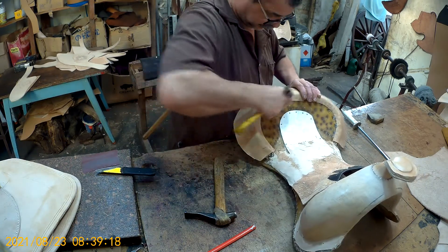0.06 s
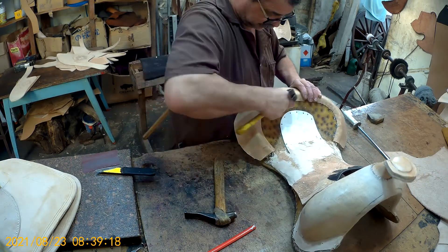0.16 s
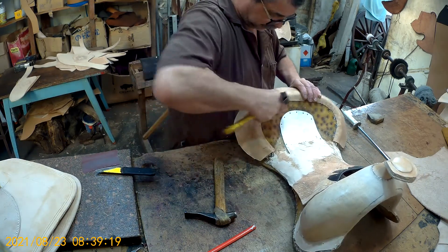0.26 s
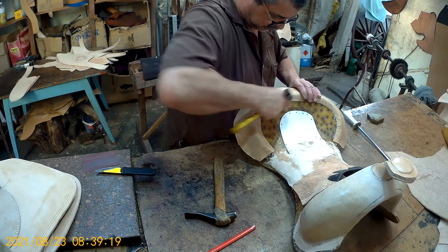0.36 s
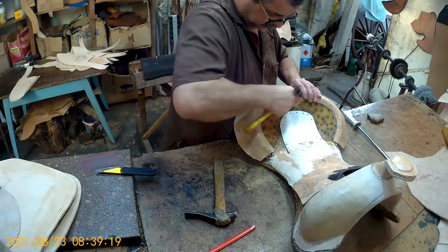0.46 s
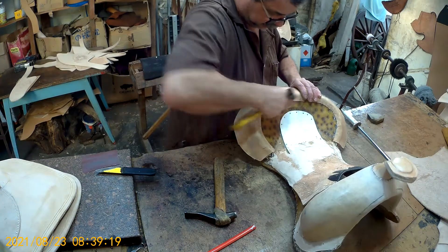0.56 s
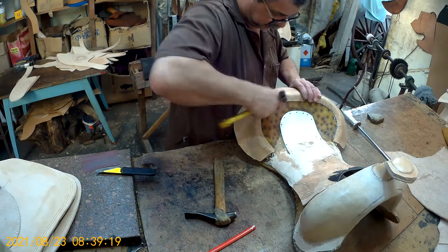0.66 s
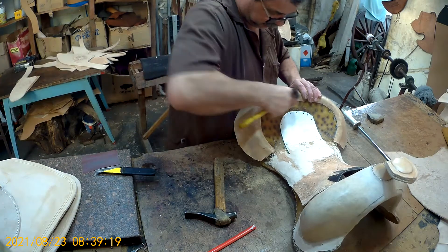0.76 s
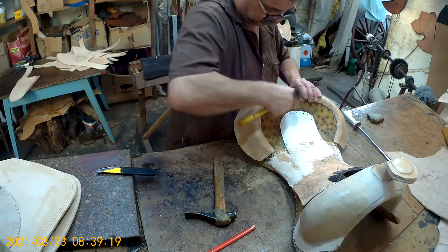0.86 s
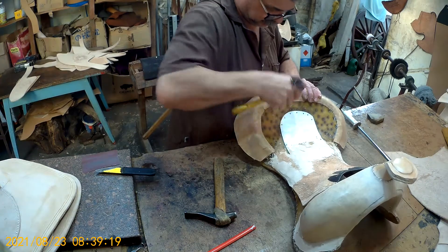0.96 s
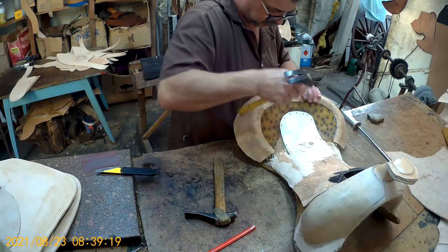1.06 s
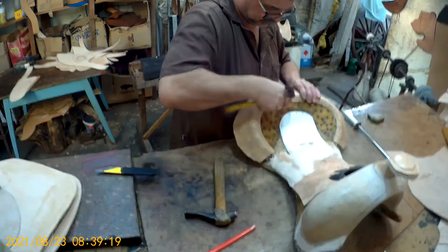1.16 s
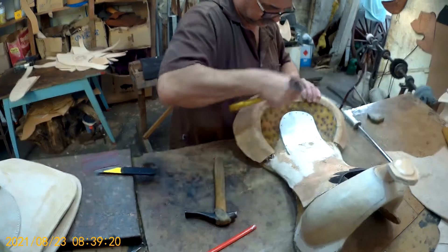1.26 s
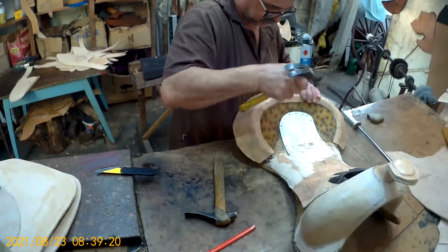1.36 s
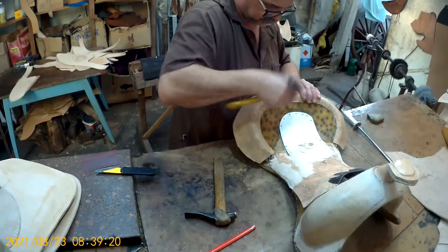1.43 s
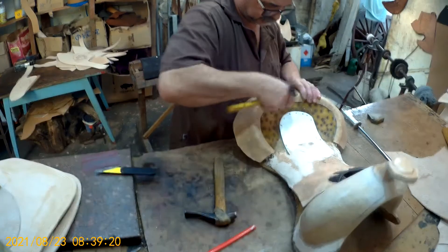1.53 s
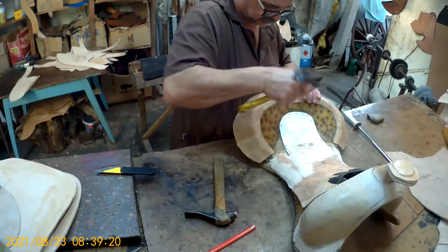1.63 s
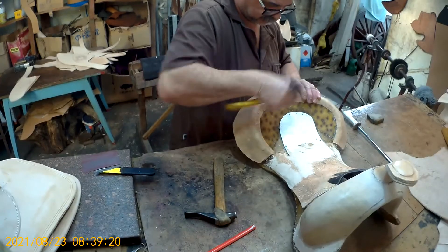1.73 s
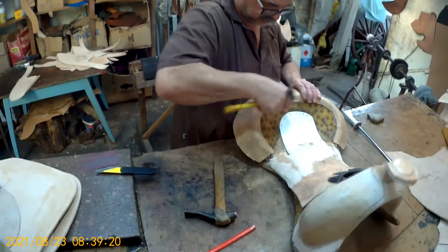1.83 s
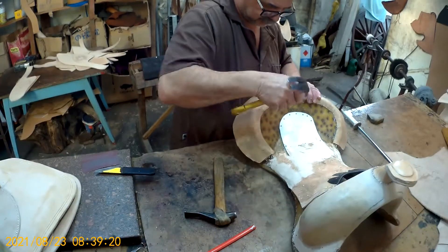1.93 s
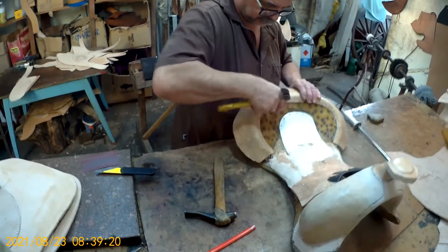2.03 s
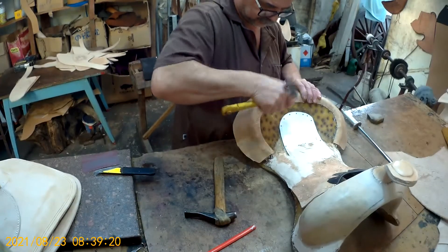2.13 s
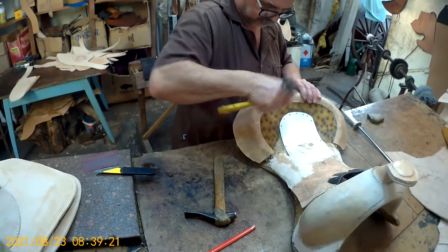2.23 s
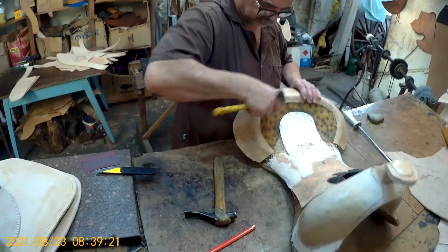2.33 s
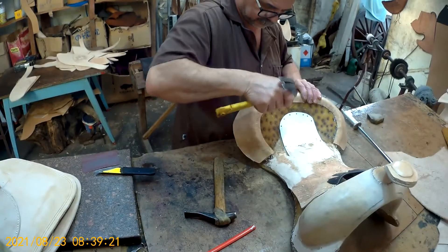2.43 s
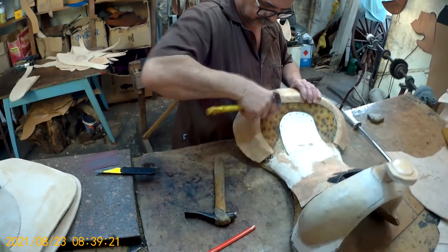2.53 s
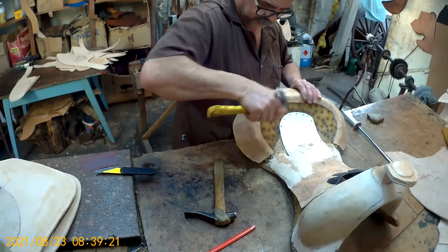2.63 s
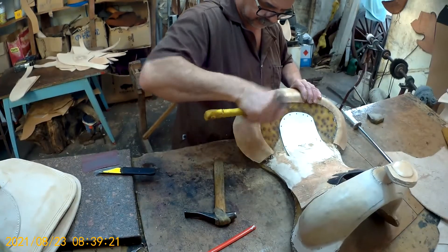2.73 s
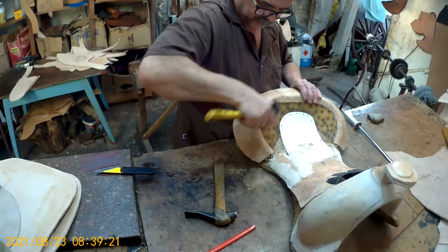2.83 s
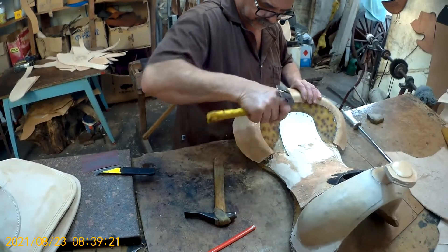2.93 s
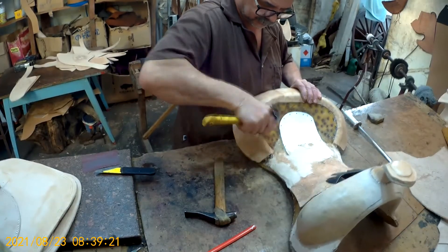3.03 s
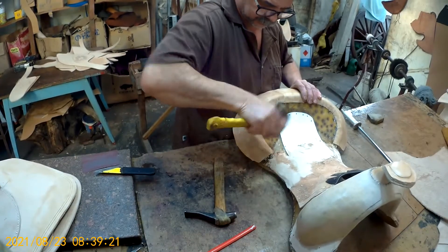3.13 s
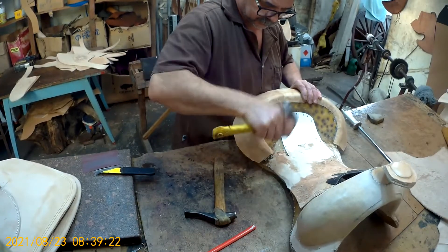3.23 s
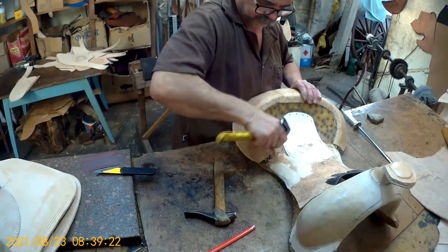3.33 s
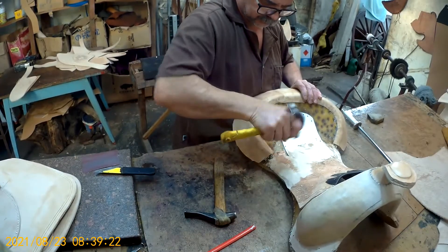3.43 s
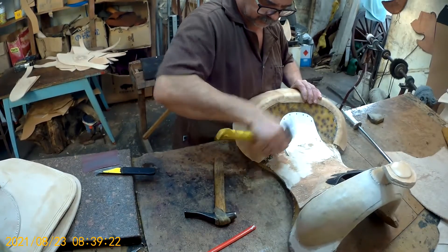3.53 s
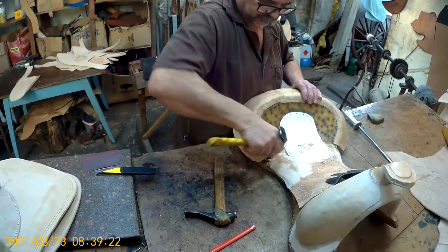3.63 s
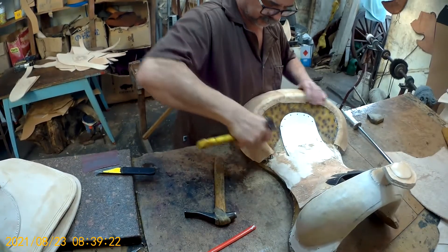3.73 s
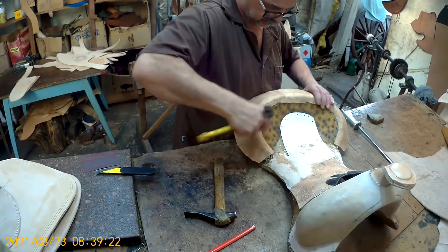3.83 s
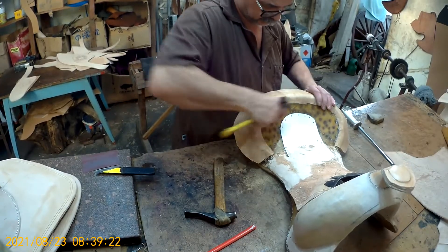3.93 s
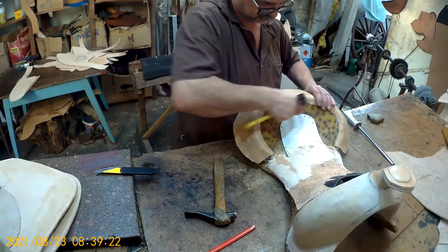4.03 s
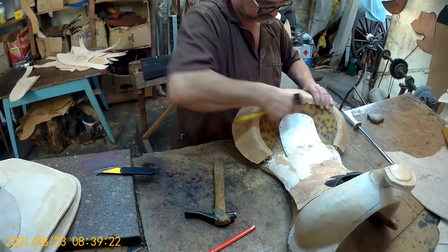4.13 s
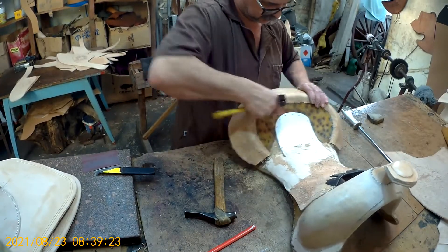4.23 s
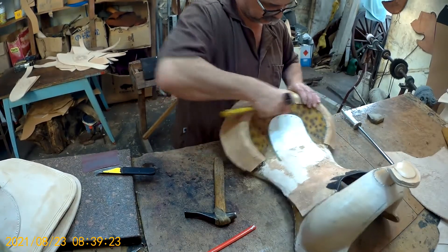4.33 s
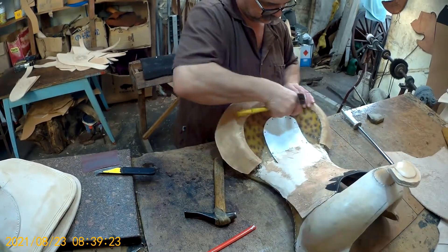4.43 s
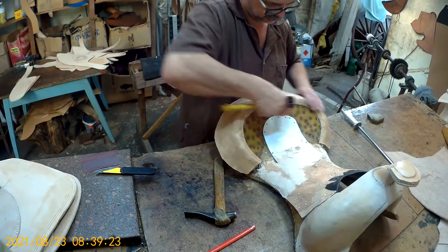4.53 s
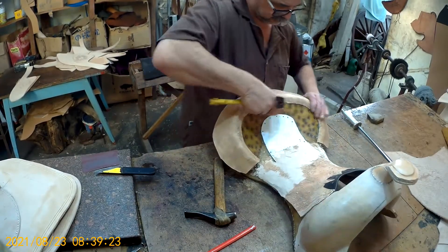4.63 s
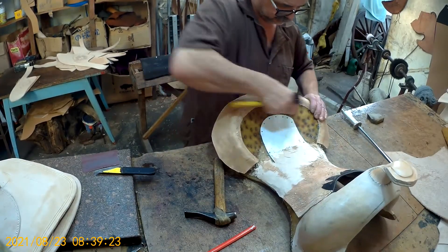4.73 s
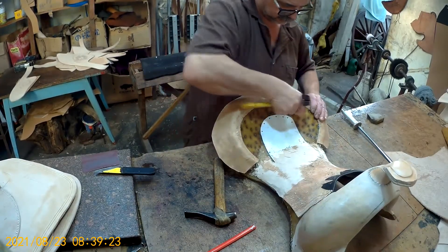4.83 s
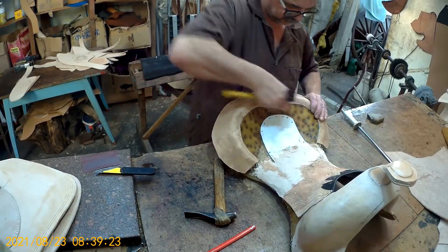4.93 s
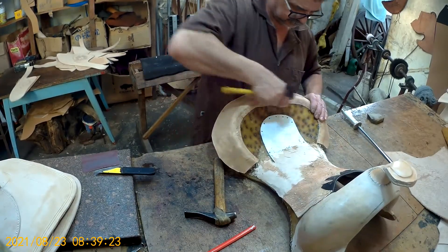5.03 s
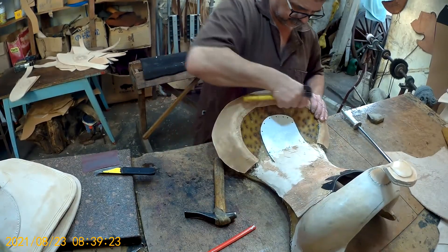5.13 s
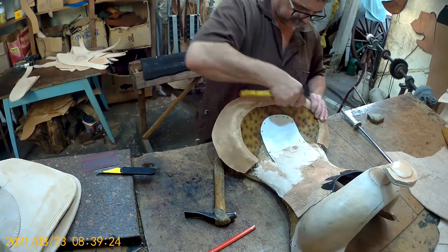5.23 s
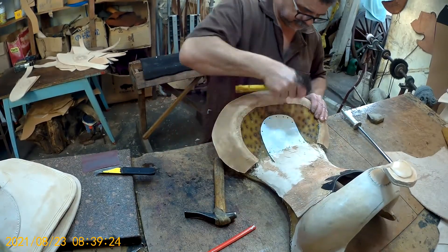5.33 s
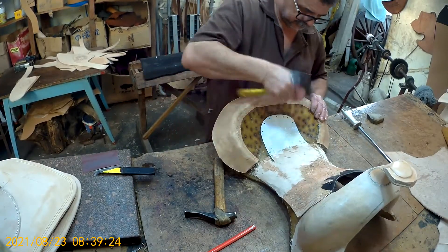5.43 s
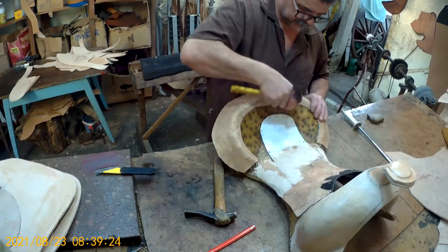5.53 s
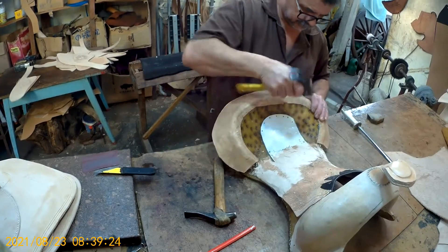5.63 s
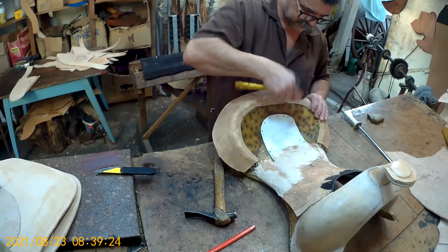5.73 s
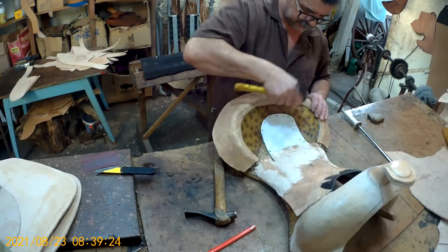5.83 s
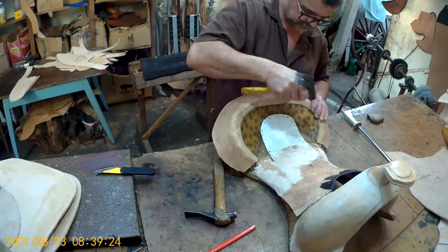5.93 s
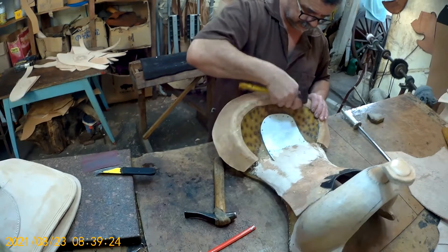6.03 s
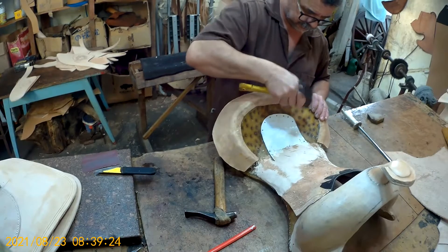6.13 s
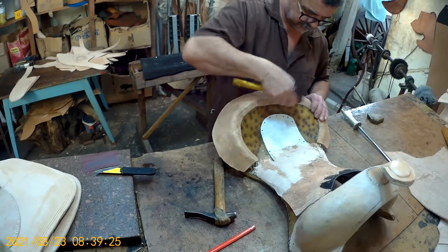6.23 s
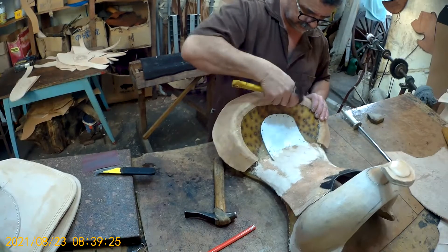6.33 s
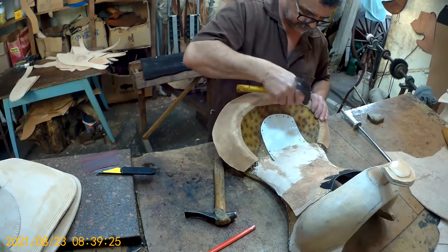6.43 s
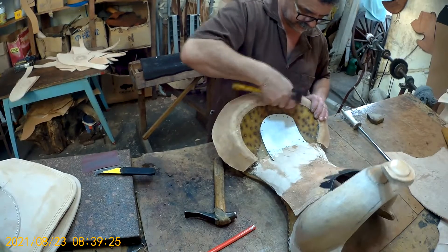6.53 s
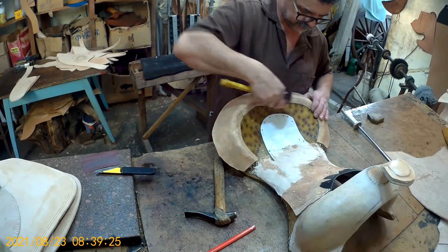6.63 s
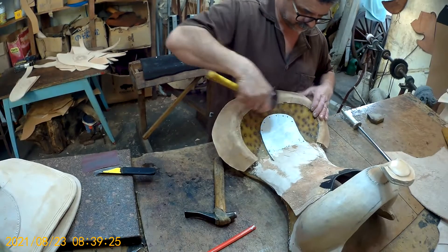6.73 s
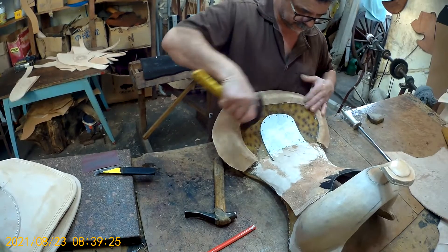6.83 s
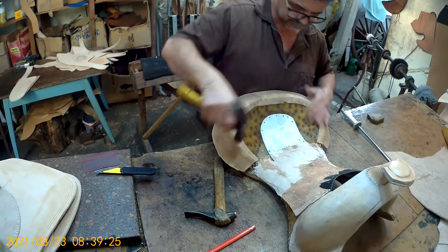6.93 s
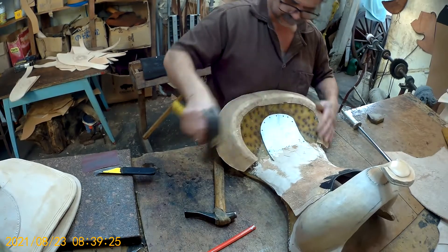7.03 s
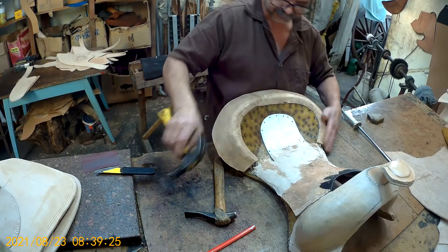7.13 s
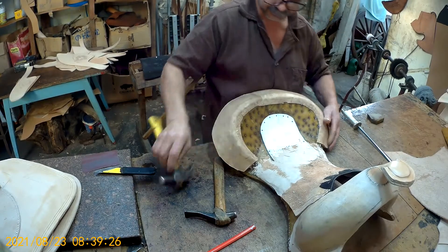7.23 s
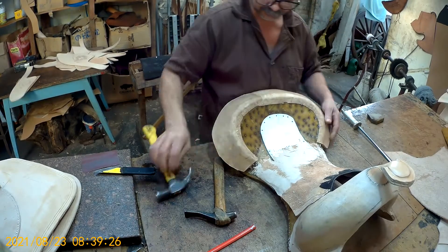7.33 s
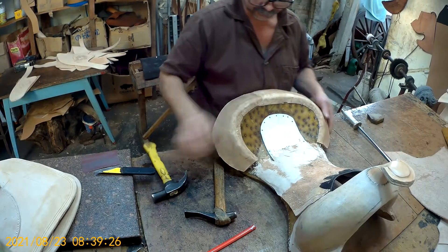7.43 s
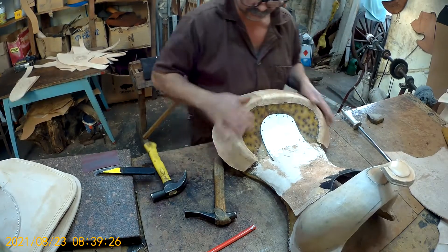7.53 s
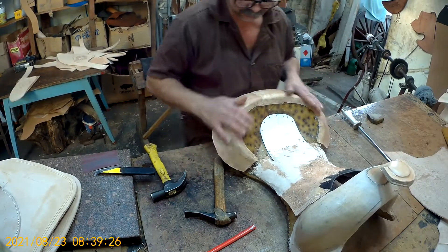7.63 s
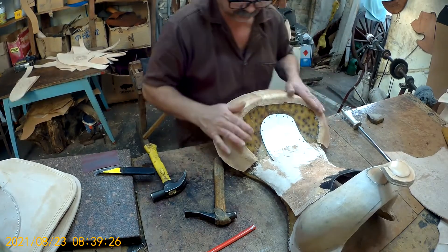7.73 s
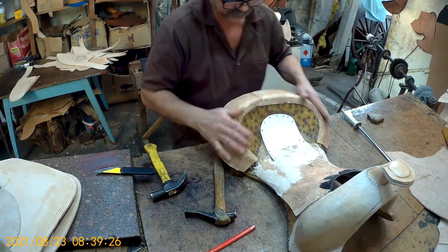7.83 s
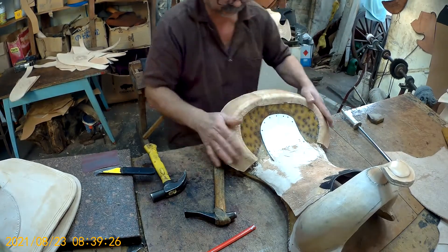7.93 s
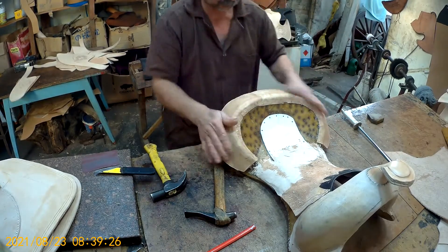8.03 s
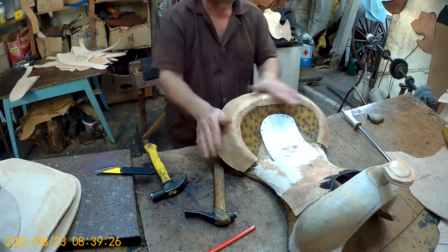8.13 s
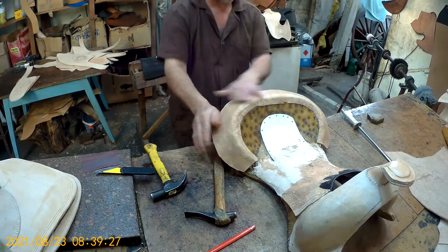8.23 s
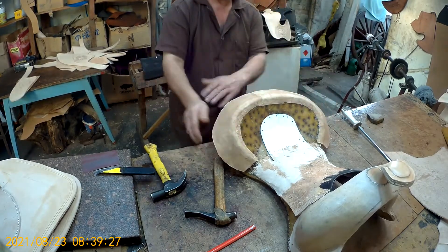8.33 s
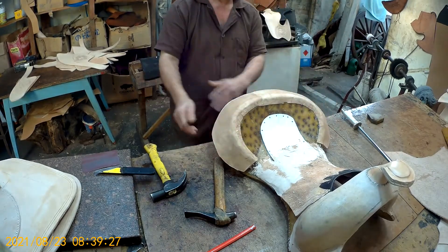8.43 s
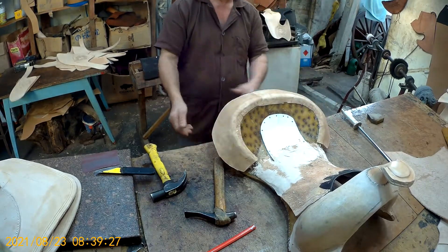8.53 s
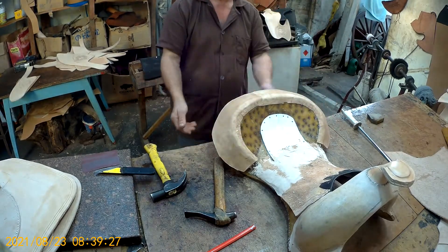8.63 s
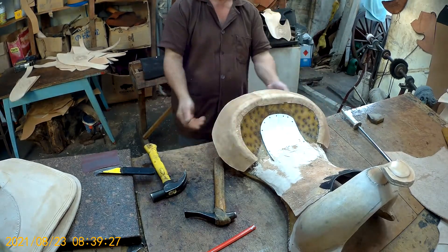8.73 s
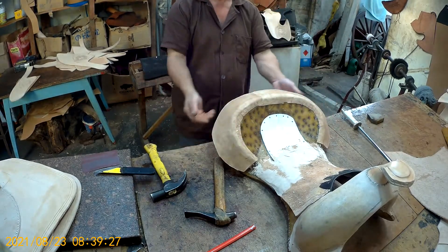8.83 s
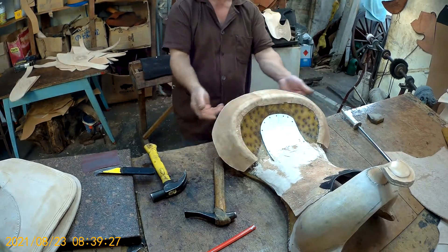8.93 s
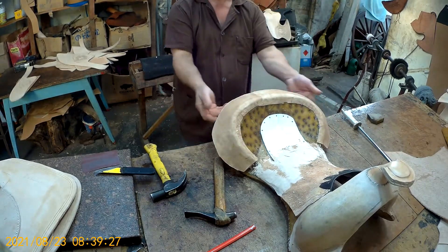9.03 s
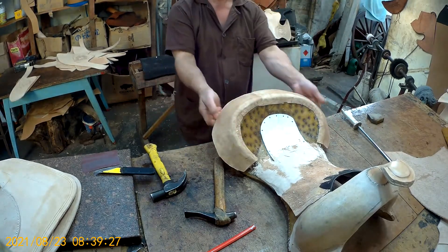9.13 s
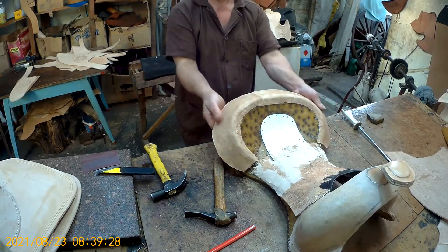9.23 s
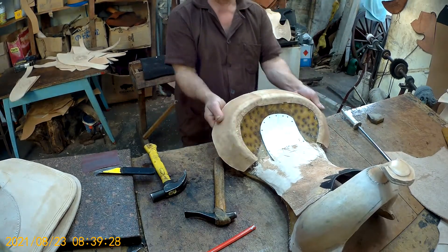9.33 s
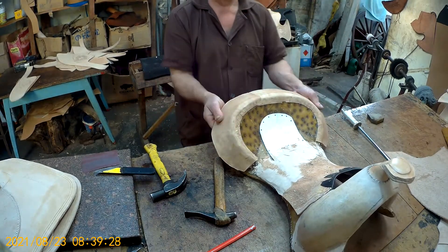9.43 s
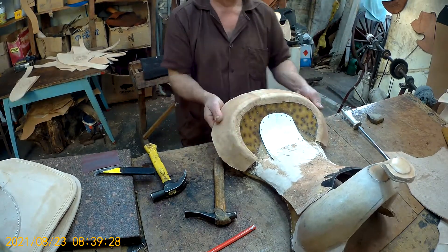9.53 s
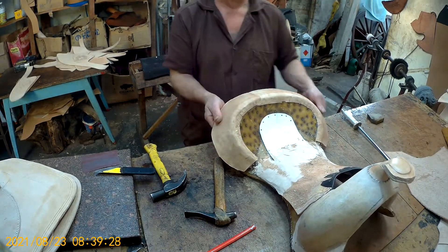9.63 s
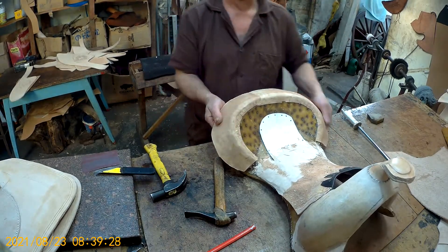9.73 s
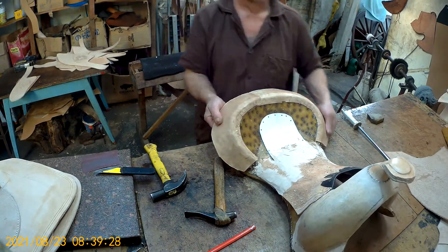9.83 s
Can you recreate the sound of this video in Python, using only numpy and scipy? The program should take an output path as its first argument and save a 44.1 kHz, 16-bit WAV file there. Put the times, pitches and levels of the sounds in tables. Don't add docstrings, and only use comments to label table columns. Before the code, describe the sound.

In a small workshop, hollow woody hammer blows come in two runs between leathery scrapes, ending with a tool clacking down and soft rubbing.

```python
import sys
import numpy as np
from scipy import signal
from scipy.fft import next_fast_len
from scipy.io import wavfile
from scipy.ndimage import uniform_filter1d, minimum_filter1d

SR = 44100
rng = np.random.default_rng(int(sys.argv[2]) if len(sys.argv) > 2 else 0)


def int16_out(signal):
    q = np.round(np.clip(np.atleast_2d(signal).T, -1, 1) * 32767)
    wavfile.write(sys.argv[1], SR, q.astype(np.int16))


def ratio_of_db(decibels):
    return 10 ** (np.asarray(decibels, float) / 20)


N = 435266

# t/s, level/dB, place along the rim [0-2]
BLOWS = [(1.066, 2.5, 0.14), (1.378, 3.5, 0.2), (1.683, 2, 0.088), (1.943, 1, 0), (2.196, 1.5, 0.16),
         (2.447, -2.5, 0.74), (2.69, -4.5, .98), (2.947, -3.5, 1.03), (3.205, -0.5, 1.25),
         (3.473, -2, 0.29), (5.407, 3.5, 2.04), (5.684, 3.5, 1.9), (5.931, 3, 2.5), (6.174, 3.5, 1.95),
         (6.42, 2.5, 1.92)]
# level/dB at place 0, 1, 2
RIM_DRIVE = [(-19, -15, -18), (-14.5, -2.5, -19.5), (-11.5, -6.5, -11.5), (-6, -11, -16)]
# t/s, level/dB, bench weight/dB, hardness/dB (shell up, bend down)
ROCKS = [
    (1.125, -23, -19, 7),
    (1.168, -22, 7, 5),
    (1.435, -23, -23, 3),
    (1.482, -20, 2.5, 1.5),
    (1.738, -35, 11, -15),
    (1.775, -26, 9.5, -4),
    (2.04, -35, 15.5, -12.5),
    (3.62, -70, 7, 3),
]
# t/s, level/dB, bench weight/dB, hardness/dB
LAID_DOWN = [
    (7.192, -10, -11.5, 0),
    (7.275, -7, -10.5, 2),
    (7.291, -2.5, -25, 4.5),
    (7.337, -14, -3, -4.5),
    (7.352, -3.5, -36, 2.5),
    (7.394, -10.5, -36, 1.5),
    (7.412, -35, -3, 14),
    (7.494, -26.5, -23, 13),
    (7.568, -30.5, -13, 3),
]
# t/s, level/dB, bench weight/dB, hardness/dB
KNOCKS = [(.109, -30.5, 9.5, -5), (.31, -47, 0, 13), (.33, -37, 0, -4), (.368, -27, -2, 2.5),
          (.467, -22, 3.5, -1.5), (.547, -30.5, 7, 0.5), (.658, -38.5, -1, 3.5), (.682, -36.5, -3, -8),
          (.782, -47, -14, 11), (3.739, -43, 7, 13), (3.827, -41, 12.5, 9), (3.901, -33.5, 11.5, 6.5),
          (4.247, -25.5, 4, -3.5), (4.337, -37, 11, -2), (4.427, -20.5, -11, 10.5),
          (4.669, -26.5, -17, -4.5), (6.671, -17, -3, 3), (6.691, -24.5, -0.5, 7), (6.711, -20, -6, -4),
          (6.737, -31, 3, 11), (6.765, -45, 2, -1)]

# f/Hz, level/dB, t60/s
BENCH = [(43.7, -21, 0.4), (73.3, -19, 0.59), (114.2, -2.5, 0.28), (153.4, -3.5, 0.11), (194, -11.5, 0.12),
         (238.5, -2.5, 0.12)]
# f/Hz, level/dB, t60/s
BEND = [(276, -15.5, 0.14), (358.6, 0, 0.087), (319, -17, 0.2), (408.8, 0, 0.078), (470, -9, 0.076),
        (517.6, -7.5, 0.1)]
# f/Hz, level/dB, t60/s
RING = [(593, -7.5, 0.047), (690.6, -2, 0.074), (826, -6, 0.054), (728.8, -5.5, 0.1), (635, -9.5, 0.03)]
# f/Hz, level/dB, t60/s
SHELL = [(900.5, -2.5, 0.038), (969, -3.5, 0.042), (1050, 1, 0.025), (1198.6, -5.5, 0.026),
         (1316, -4.5, 0.02), (1542, -7.5, 0.014), (1811, -14, 0.022), (2196, -15, 0.021),
         (2834, -27.5, 0.044)]
# rise/s, roughness [0-1]
RISE_ROUGH = [(.012, .15), (.002, .2), (.0012, .15), (.0007, .7)]
# f/Hz, level/dB, t60/s
CRACK = [(251, 12, 0.056), (775, 11, 0.0083), (1600, -27, 0.25), (2420, -6.5, 0.02), (3680, -6.5, 0.012),
         (7660, -8, 0.0067), (16000, -19, 0.022)]

# peak t/s, level/dB, rise/s, fall/s
DRAGS = [(0, -28.5, .01, 0.072), (.118, -34, .03, .1), (.382, -30.5, 0.12, 0.089), (.466, -30, 0.008, 0.19),
         (.662, -39, .06, 0.35), (3.72, -37, 0.056, 0.87), (3.896, -33.5, .06, .06),
         (4.214, -28.5, 0.27, 0.44), (4.428, -18.5, 0.012, 0.077), (4.65, -36, 0.22, 0.35),
         (6.664, -36, 0.027, .03), (6.736, -21, 0.13, .07), (6.95, -39.5, 0.11, .9),
         (7.41, -11.5, .005, 0.045), (7.51, -24, 0.097, 0.18), (7.8, -40.5, .5, 0.34),
         (7.97, -36, 0.059, 0.37), (8.2, -43, 0.22, .07), (8.98, -33.5, 0.12, 0.46),
         (9.34, -38.5, 0.3, 0.54), (9.69, -29.5, 0.034, 0.14), (9.75, -37, 0.23, 0.013),
         (9.86, -40, 0.1, .1)]
# peak t/s, level/dB, rise/s, fall/s
SHOVES = [(0, -25.5, .01, .06), (.2, -30, 0.18, 0.04), (.32, -20, .03, 0.058), (.494, -16, .05, 0.085),
          (.662, -23.5, 0.023, 0.29), (3.65, -27, .1, 0.063), (3.862, -26, 0.13, 0.092),
          (3.966, -35, 0.13, 0.29), (4.26, -17.5, 0.029, 0.21), (4.68, -22, 0.12, 0.12),
          (5.082, -35, .35, .13), (5.37, -34, 0.093, .01), (6.67, -33, 0.036, 0.37),
          (7.16, -36, 0.22, 0.013), (7.41, -36, .005, .055), (7.51, -32, .02, .065),
          (8.03, -42, 0.27, 0.14), (9.25, -36, 0.49, 1), (9.7, -46, 0.17, .1)]
# peak t/s, level/dB, rise/s, fall/s
WIPES = [(.44, -48, 0.61, .1), (.662, -45, .05, 0.74), (3.688, -38, .06, 0.13), (3.86, -44, .2, .2),
         (4.248, -39, 0.068, 0.33), (4.68, -43, 0.13, 0.16), (6.906, -34, 0.18, 0.37), (7.43, -40, .02, .2),
         (7.5, -34.5, .05, 0.21), (7.8, -34, 0.54, 0.06), (7.95, -31, 0.093, 0.67),
         (8.17, -29.5, 0.62, 0.08), (9.2, -42.5, 0.17, 0.54), (9.7, -35, 0.13, 0.11), (9.86, -46, .2, .1)]
STROKE_DB = 20
# f/Hz, width/Hz, level/dB
SCRAPE = [(330, 150, -25), (600, 170, 31), (925, 380, 40), (1440, 270, 11), (2260, 410, -46)]
# f/Hz, width/Hz, level/dB
RUMBLE = [(58, 10.5, -3), (108, 21, -6), (143, 4.9, -45)]
# f/Hz, level/dB per Hz
SWISH = [(900, -6), (2300, -1), (4000, 0), (5500, -11), (6900, -5), (8400, -10), (9000, -15), (16000, -17)]
# t/s, level/dB, f/Hz
TICKS = [(0.112, -27, 1490), (.333, -26.5, 2320), (0.469, -21.5, 1550), (.468, -33, 2500),
         (0.549, -26, 1480), (.548, -38, 2400), (.685, -34, 2300), (0.785, -32, 1700), (3.739, -34, 1210),
         (4.388, -32, 1800), (4.428, -22.5, 2600)]
# t/s, length/s, f/Hz, level/dB
HUM = (.8, .19, 137, -30)

# f/Hz, t60/s
SHOP = [(150, 0.48), (400, 0.45), (800, 0.45), (1500, .42), (2500, 0.48), (4500, 0.16), (9000, 0.066)]
# f/Hz, level/dB per Hz
AIR = [(15, -21), (30, 0), (108, 1), (335, 0.5), (659, -4), (1130, -6), (2910, -16.5), (15000, -25)]
DROPOUTS = [.24, 1.55, 1.78, 1.84, 2.3, 2.8, 3.06, 3.16, 3.42, 4.27, 4.56, 4.65, 4.92, 5.67, 6.68, 6.79,
            6.81, 6.96, 7.24, 7.58, 8.65, 8.94, 9.74]


def strikes(rows, drive_db, contact_s, crack_db):
    lanes = np.zeros((3, N))
    chance = rng.standard_normal((len(rows), 4, 9, 2))
    crack = cracks(count=len(rows))
    push = np.hanning(max(round(contact_s * SR), 3))
    push /= push.sum()
    for k, (s, db, *spot_db) in enumerate(rows):
        parts = zip((BENCH, BEND, RING, SHELL), chance[k], RISE_ROUGH, spot_db)
        body = sum(ratio_of_db(part_db) * part_rings(modes, luck, rise_s, rough)
                   for modes, luck, (rise_s, rough), part_db in parts)
        body = np.convolve(body, push)
        dull = np.hanning(3 + round(max(-.35 * db, 0)))
        snap = np.convolve(crack[k], dull / dull.sum())
        add(body, 0, ratio_of_db(crack_db + .5 * spot_db[-1]) * snap)
        add(lanes[k % len(lanes)], s, ratio_of_db(db + drive_db) * body)
    return lanes


def on_rim(rows):
    return [(s, db, *(np.interp(place, range(3), part) for part in RIM_DRIVE)) for s, db, place in rows]


def loose(rows):
    return [(s, db, weight_db, -hard_db, 0, hard_db) for s, db, weight_db, hard_db in rows]


def part_rings(modes, chance, rise_s, rough):
    t = np.arange(SR // 3) / SR
    size_db, pitch = chance[:, 0], 1 + .004 * chance[:, 1]
    buzz = rng.standard_normal((len(modes), 80))
    ring = np.zeros(len(t))
    for k, (hz, db, t60) in enumerate(modes):
        level = ratio_of_db(db + size_db[k] - 60 * t / t60)
        wobble = 1 + rough * np.interp(t, np.arange(80) / 160, buzz[k])
        ring += (-1) ** k * level * wobble * np.sin(2 * np.pi * hz * pitch[k] * t)
    ring *= 1 - np.exp(-(t / rise_s) ** 2)
    ring *= np.minimum(20 * (t[-1] - t), 1)
    return ring / np.sqrt(np.mean(ring[:900] ** 2))


def cracks(count):
    hz, (f, db, t60) = np.fft.rfftfreq(128, 1 / SR), np.transpose(CRACK)
    t, z = signal.stft(rng.standard_normal((count, 8192)), SR, nperseg=128)[1:]
    z = z * ratio_of_db(np.interp(hz, f, db)[:, None] - 60 * t / np.interp(hz, f, t60)[:, None])
    burst = signal.istft(z, SR, nperseg=128)[1]
    return burst / np.sqrt(np.mean(burst[:, :600] ** 2))


def drags():
    size = ratio_of_db(2.4 * np.minimum(rng.exponential(1, N), 5))
    slips = size * (rng.random(N) < 1200 / SR) * rng.standard_normal(N)
    scrape = resonances(evened(slips) + 1.3 * rng.standard_normal(N), SCRAPE)
    scrape = resonances(scrape, [(1100, 2500, 0)])
    return strokes(DRAGS) * scrape


def shoves():
    rumble = resonances(rng.standard_normal(N), RUMBLE)
    return strokes(SHOVES) * resonances(rumble, [(90, 230, 0)])


def wipes():
    return strokes(WIPES) * noise(SWISH, patchy_db=1.2)


def strokes(rows):
    t = np.arange(0, N + 32, 32) / SR
    power = np.zeros(len(t))
    for s, db, rise, fall in rows:
        away = np.maximum((s - t) / abs(rise), (t - s) / abs(fall))
        power += ratio_of_db(db - STROKE_DB * away) ** 2
    return np.interp(np.arange(N) / SR, t, np.sqrt(power))


def ticks():
    t, out = np.arange(2000) / SR, np.zeros(N)
    t60_s = 0.022
    for s, db, hz in TICKS:
        add(out, s, ratio_of_db(db - 60 * t / t60_s) * np.sin(2 * np.pi * hz * t))
    return out


def hum():
    s, length, hz, db = HUM
    t, out = np.arange(0, length, 1 / SR), np.zeros(N)
    add(out, s, ratio_of_db(db) * np.hanning(len(t)) * np.sin(2 * np.pi * hz * t))
    return out


def shop(lanes):
    taps = np.zeros((3, SR // 2))
    slots = np.arange(260, SR // 2 - 20, 20)
    at = slots + rng.integers(0, 20, (3, len(slots)))
    np.put_along_axis(taps, at, rng.choice([-1., 1.], at.shape), 1)
    hz, t, z = signal.stft(taps, SR, nperseg=512)
    z = z * ratio_of_db(-60 * t / read(SHOP, hz)[:, None])
    tail = signal.istft(z, SR, nperseg=512)[1]
    return signal.fftconvolve(lanes, tail / np.linalg.norm(tail[0]), axes=1)[:, :N].sum(0)


def diffused(tail):
    depth_rad, rate_hz, shine_db = 1.6, 45, 1
    wander = evened(signal.lfilter(*signal.butter(2, rate_hz, fs=SR), rng.standard_normal(N)))
    upper = signal.filtfilt(*signal.butter(2, 850, "high", fs=SR), tail)
    spread = signal.hilbert(upper, next_fast_len(N))[:N] * np.exp(1j * depth_rad * wander)
    return tail - upper + ratio_of_db(shine_db) * spread.real


def room_air():
    return ratio_of_db(-41) * noise(AIR, patchy_db=0.5)


def noise(spectrum, patchy_db):
    a, b, patches = rng.standard_normal((N // 256 + 5, 513, 3)).T
    patches = uniform_filter1d(patches, size=12, axis=0)
    patches = evened(uniform_filter1d(patches, size=12, axis=1))
    colour_db = read(spectrum, np.fft.rfftfreq(1024, 1 / SR))[:, None]
    z = (a + 1j * b) * ratio_of_db(colour_db + patchy_db * patches)
    return evened(signal.istft(z, nperseg=1024, noverlap=768)[1][:N])


def resonances(x, peaks):
    return evened(sum(ratio_of_db(db) * signal.lfilter(*signal.iirpeak(hz, hz / width, SR), x)
                      for hz, width, db in peaks))


def evened(x):
    return x / np.sqrt(np.mean(x ** 2) + 1e-20)


def read(points, hz):
    f, value = np.transpose(points)
    return np.interp(np.log(hz + 1), np.log(f + 1), value)


def add(mix, s, sound):
    part = mix[round(s * SR):][:len(sound)]
    part += sound[:len(part)]


def scene():
    lanes = strikes(on_rim(BLOWS), drive_db=8.0, contact_s=0.00036, crack_db=-11.5)
    lanes += strikes(loose(ROCKS), drive_db=3, contact_s=.0008, crack_db=-16)
    lanes += strikes(loose(LAID_DOWN), drive_db=-2, contact_s=0.00026, crack_db=0)
    lanes += strikes(loose(KNOCKS), drive_db=-8, contact_s=0.00019, crack_db=-11)
    thin = signal.lfilter(*signal.butter(2, 190, "high", fs=SR), lanes)
    echoes = ratio_of_db(-15.0) * diffused(shop(thin))
    slides = ratio_of_db(-4.0) * drags() + ratio_of_db(-6) * shoves() + ratio_of_db(-6.5) * wipes()
    return (lanes.sum(0) + echoes + slides + ticks() + hum() + room_air())[None]


def ducked_by_gain_control(dry):
    lag_s, fall_db_per_s, threshold_db, strength = 0.019, 127.0, -22, 0.23
    t = np.arange(N) / SR
    power = signal.lfilter([1 / 900], [1, 1 / 900 - 1], dry[0] ** 2)
    fall = t * fall_db_per_s
    held_db = np.maximum.accumulate(10 * np.log10(power + 1e-12) + fall) - fall
    over_db = np.maximum(held_db - threshold_db, 0)
    late_db = np.interp(t - lag_s, t, uniform_filter1d(over_db, size=400, origin=199))
    return dry / ratio_of_db(strength * late_db)


def overloaded(x):
    flat = .9 * np.tanh(abs(x / .9) ** 6) ** (1 / 6) * np.sign(x)
    flat = signal.sosfilt(signal.butter(1, 22, "high", fs=SR, output="sos"), flat)
    return signal.oaconvolve(flat, signal.firwin(95, 15800, fs=SR)[None], "same")


def dim_top(flat, ducked):
    lowpass = signal.firwin(255, 8700, window=("kaiser", 7), fs=SR)
    low = signal.oaconvolve(flat, lowpass[None], "same")
    quick_db = 10 * np.log10(uniform_filter1d(np.diff(low[0], prepend=0) ** 2, size=128) + 1e-12)
    onset = quick_db - uniform_filter1d(quick_db, size=512, origin=255) > 9
    top_db = np.where(onset | (abs(ducked[0]) > .85), -15., 0)
    top_db = uniform_filter1d(minimum_filter1d(top_db, size=1100), size=128)
    return low + ratio_of_db(top_db) * (flat - low)


def drop_treble(x):
    lost = np.zeros(N)
    for s in DROPOUTS:
        add(lost, s - .012, signal.windows.tukey(1000, .6))
    highpass = signal.firwin(127, 3600, fs=SR, pass_zero=False)
    treble = signal.oaconvolve(x, highpass[None], "same")
    return x - np.minimum(lost, 1) * treble


def roll_off(x):
    return signal.sosfilt(signal.butter(12, 16220, fs=SR, output="sos"), x)


def record(dry):
    ducked = ducked_by_gain_control(dry)
    flat = overloaded(ducked)
    mix = drop_treble(dim_top(flat, ducked))
    return roll_off(mix)


dry = scene()
out = record(dry)
int16_out(out)
```